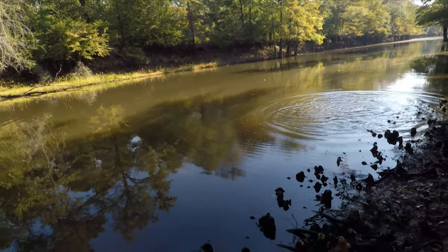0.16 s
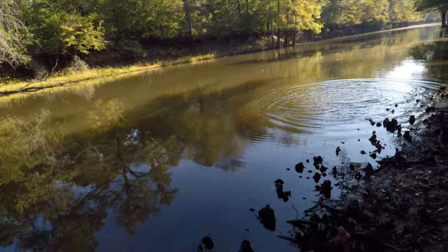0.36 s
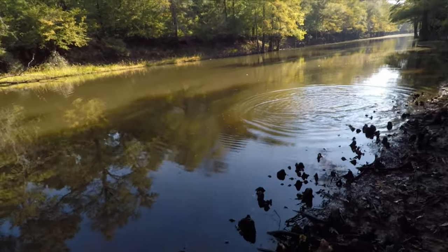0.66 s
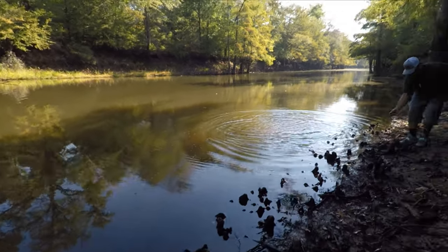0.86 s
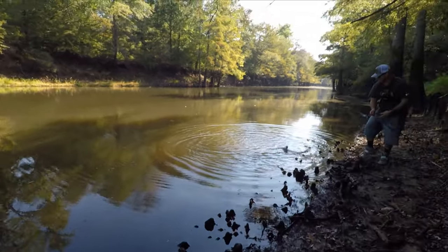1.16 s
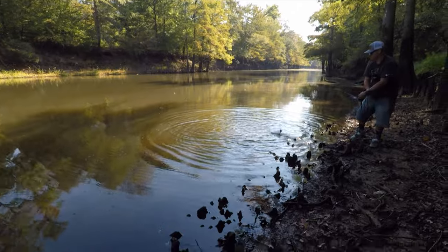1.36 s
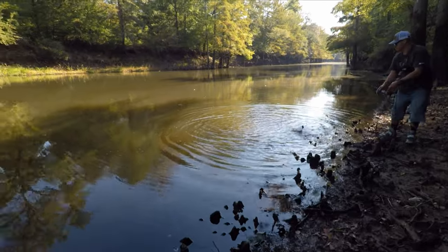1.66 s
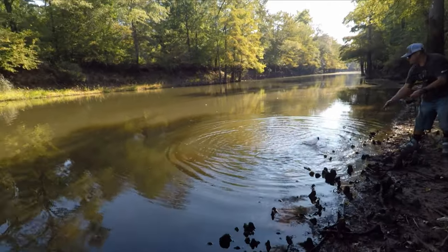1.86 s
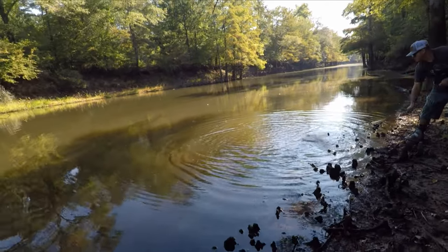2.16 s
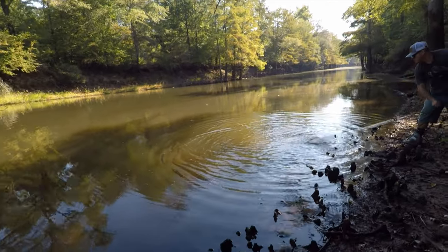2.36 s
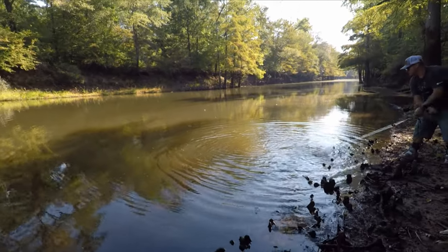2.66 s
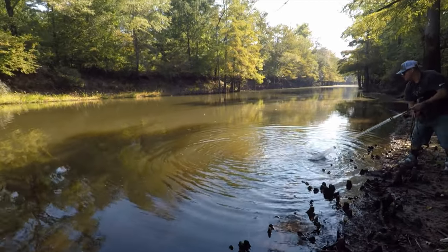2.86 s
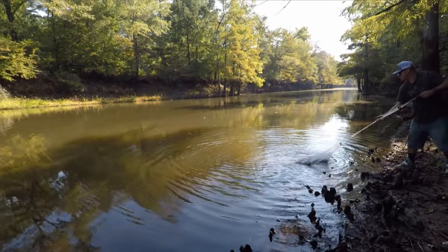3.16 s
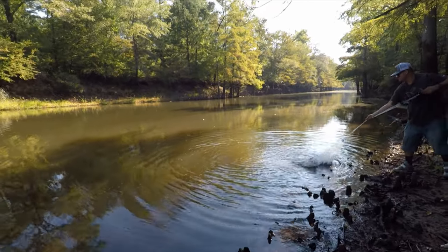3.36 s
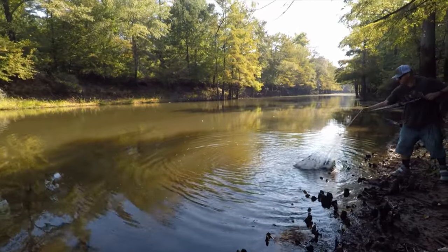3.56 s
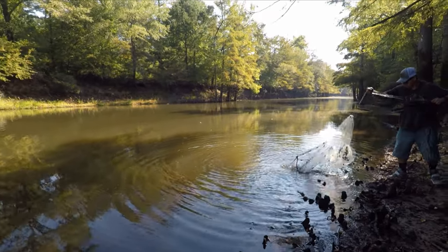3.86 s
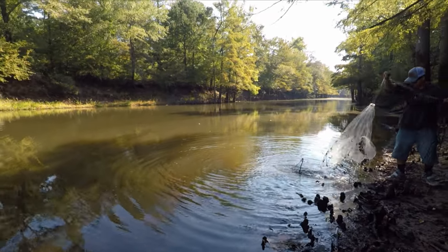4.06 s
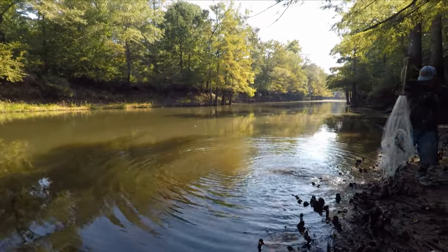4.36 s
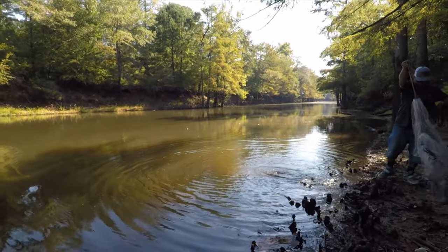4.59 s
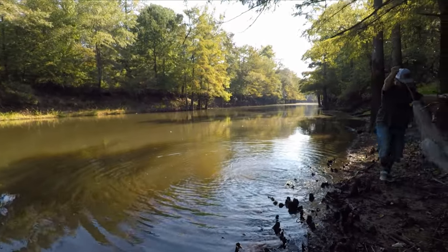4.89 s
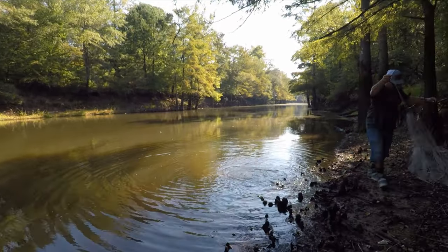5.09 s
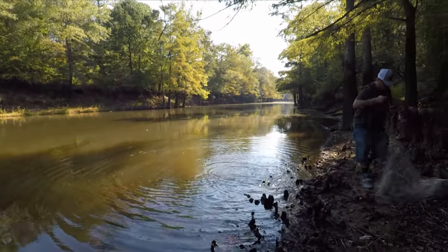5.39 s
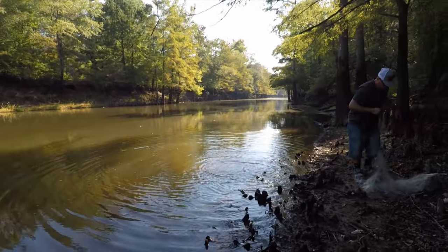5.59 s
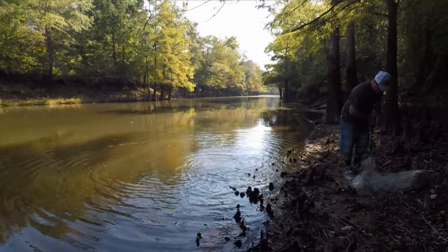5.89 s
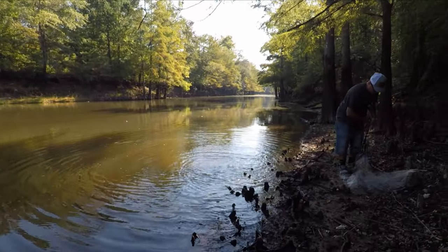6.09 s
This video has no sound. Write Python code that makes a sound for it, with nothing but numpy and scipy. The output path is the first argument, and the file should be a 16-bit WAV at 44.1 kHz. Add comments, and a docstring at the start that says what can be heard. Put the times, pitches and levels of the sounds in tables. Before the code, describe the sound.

A hand-held stereo camera microphone outdoors: low gusts dominate early, heaviest around two seconds, over handling thuds and a thin insect whine. Then water streams and patters off a lifted net, crowded with bright ticks and snaps. One dry knock on the housing is followed by dull fumbling, thinning drips and a brief leafy rustle as the net lands.

```python
"""Water drains in bubbles, drops and spray from a wet cast net hauled out of a calm river and dropped on the bank.
Clicks that ring in narrow bands make the water; short bursts and tones make the snaps of line and leaves.
Filtered noise makes the rustling leaves, soft swishes, far woods and river; dense ringing makes the insects.
A hand-held camera hears it: wind buffets and pops its two microphone ports, and faint blips repeat.
The hand rubs, bumps and once knocks the housing, which rings in its own modes."""
import sys
import numpy as np
from scipy import signal
from scipy.fft import rfft, irfft, next_fast_len
from scipy.io import wavfile
from scipy.ndimage import uniform_filter1d

SR = 44100
rng = np.random.default_rng(int(sys.argv[2]) if len(sys.argv) > 2 else 0)


def file_out(sig):
    """Save sig as 16-bit WAV at sys.argv[1]."""
    # one column per channel
    cols = np.atleast_2d(sig).T
    # limit, then scale
    lim = np.clip(cols, -1, 1)
    pcm = np.round(lim * 32767).astype(np.int16)
    wavfile.write(sys.argv[1], SR, pcm)


N = 274726   # length in samples
OPPOSITE = np.array([[1], [-1]])   # puts a sound at the two ports with opposite signs


def from_db(db):
    """Turn a level in dB into a gain."""
    return 10 ** (np.asarray(db) / 20)


def rms_one(x):
    """Scale each channel to rms 1."""
    return x / np.sqrt(np.mean(x ** 2, axis=-1, keepdims=True) + 1e-20)


def in_time(rows):
    """Draw straight lines between the rows of a table, giving each column a value at every sample."""
    times, *columns = np.transpose(rows)
    return [np.interp(np.arange(N) / SR, times, column) for column in columns]


def shaped(x, points, turn=0):
    """Filter by a curve of f/Hz, level/dB and turn every phase by the same angle in radians."""
    size = next_fast_len(N)
    hz, level_db = np.transpose(points)
    bin_hz = np.arange(size // 2 + 1) * SR / size
    gain = from_db(np.interp(np.log(bin_hz + 1), np.log(hz), level_db))
    return irfft(rfft(x, size) * gain * np.exp(1j * turn), size)[..., :N]


def band(x, low_hz, high_hz):
    """Keep the sound between two frequencies with a Butterworth filter."""
    edges = [low_hz, min(high_hz, SR / 2.2)]
    return signal.sosfilt(signal.butter(2, edges, "band", fs=SR, output="sos"), x)


def low_pass(x, hz):
    """Cut the sound steeply above a frequency with a Butterworth filter."""
    return signal.sosfilt(signal.butter(6, hz, fs=SR, output="sos"), x)


def drift(rate):
    """Wander slowly at random with mean 0 and spread 1; a higher rate wanders faster."""
    r = np.exp(-80 * np.pi * rate / SR)
    noise = rng.standard_normal(N // 40 + 2002)
    slow = signal.lfilter([1], [1, -2 * r, r * r], noise)[2000:]   # one value for 40 samples
    return np.interp(np.arange(N) / 40, np.arange(len(slow)), rms_one(slow - slow.mean()))


def resonance(x, hz, width_hz):
    """Ring at one frequency: a two-pole peak of about gain 1; a narrow peak rings longer."""
    r = np.exp(-np.pi * width_hz / SR)
    feedback = [1, -2 * r * np.cos(2 * np.pi * hz / SR), r * r]
    return signal.lfilter(np.array([1, 0, -1]) * (1 - r * r) / 2, feedback, x)


def add(out, at_s, sound):
    """Mix in a short sound at a time."""
    at = round(at_s * SR)
    out[..., at:at + sound.shape[-1]] += sound[..., :N - at]


def pan(db):
    """Give left and right gains whose levels differ by this many dB."""
    return from_db(np.array([db / 2, -db / 2]))


def grains(low_hz, high_hz, per_s, cycles, spread_db, order=1):
    """Deal random clicks to 12 resonators; more cycles ring longer, a higher order is rounder; rms 1."""
    sizes = from_db(spread_db * np.minimum(rng.exponential(1, N), 4)) * rng.choice([-1, 1], N)
    born = rng.random(N) < per_s * from_db(4 * drift(15)) / SR   # the rate of clicks wanders
    dealt = rng.integers(0, 12, N)
    out = 0
    for k, hz in enumerate(np.geomspace(low_hz, high_hz, 12)):
        rings = sizes * born * (dealt == k) + 1e-18
        for stage in range(order):
            rings = resonance(rings, hz, 6.6 * hz / cycles)   # each stage falls 60 dB in cycles / 3
        out = out + rings
    return rms_one(out)


# tone of the far hiss, alike at both ports: f/Hz, level/dB (relative, per Hz)
HISS_TONE = [(150, -42), (250, -13), (330, 0.5), (563, -6), (978, -14), (1510, -13.5), (2090, -17),
             (2710, -17.5), (5410, -21), (7300, -18.5), (7950, -13), (8300, -23), (9890, -19.5),
             (12800, -32.5), (15500, -22.5)]
# tone of the far hiss that is opposite at the ports: f/Hz, level/dB (relative, per Hz)
HISS_SIDE_TONE = [(150, -10), (250, -5), (458, -2), (525, -4.5), (692, -2.5), (867, -10), (995, -3.5),
                  (3110, -25.5), (5310, -27), (7800, -26), (8300, -23), (12400, -33.5), (15500, -39)]
HISS_DB, HISS_SIDE_DB = -49.5, -44
INSECTS_DB, INSECTS_SWELL_DB, INSECTS_TOP_HZ = -45, 1.5, 8070


def ambience():
    """Far hiss of woods and river from shaped noise, and insects as dense ringing in one narrow band."""
    hiss = rms_one(shaped(rng.standard_normal(N), HISS_TONE))
    side_hiss = rms_one(shaped(rng.standard_normal(N), HISS_SIDE_TONE))
    mid = from_db(HISS_DB + 2.18 * drift(6.2)) * hiss
    side = from_db(HISS_SIDE_DB + 0.69 * drift(14)) * side_hiss
    chorus = [grains(7460, 7870, per_s=5000.0, cycles=170.0, spread_db=-1.0) for port in range(2)]
    insects = from_db(INSECTS_DB + INSECTS_SWELL_DB * drift(1.0)) * low_pass(chorus, INSECTS_TOP_HZ)
    return mid + side * OPPOSITE + insects


PIP_PER_S, PIP_FIRST_S = 30000 / 1001, .0037
PIP_HZ, PIP_S, PIP_DB = 8600, 0.01, -48


def pips():
    """A faint electrical blip once a picture frame: a short swelling tone, a little louder on the right."""
    length = round(PIP_S * SR)
    tone = np.sin(2 * np.pi * PIP_HZ * np.arange(length) / SR)
    pip = from_db(PIP_DB) * np.hanning(length) * tone
    out = np.zeros(N)
    for middle_s in np.arange(PIP_FIRST_S, N / SR, 1 / PIP_PER_S):
        add(out, max(middle_s - PIP_S / 2, 0), pip)
    return out * pan(-1.0)[:, None]


SLOW_DB, SLOW_FOLLOWS = -32, 1.37   # slow pressure when buffeting is -30 dB; dB per dB of buffeting
FLUTTER_DB, FLUTTER_FOLLOWS = -38.5, 1.43   # the faster flutter, likewise
SURGE_S = 0.083   # time from the crest of a surge until its rise in dB is down to 37 percent
WIND_LEFT_DB, WIND_SWAY_DB = -4, 2.5   # left minus right: average, wandering
# wind buffeting the ports, before it wanders: t/s, level/dB
BUFFETING = [(0.0, -54), (0.55, -52), (0.85, -33.5), (1.0, -29.5), (1.1, -28), (1.8, -25.5), (2.2, -26.5),
             (2.7, -27.5), (3.25, -31.5), (3.6, -35.5), (4.75, -48.5), (5.3, -53), (6.13, -38), (6.23, -45)]
# surges of the slow pressure: t/s, level/dB (above the swell)
PRESSURE_SURGES = [(1.72, 18), (1.852, 10), (1.975, 3.5), (2.144, 6.5)]


def wind():
    """Lumpy low noise, drawn apart for each port; slow pressure and flutter grow faster than buffeting."""
    buffet_db, = in_time(BUFFETING)
    t = np.arange(N) / SR
    surge_db = sum(db * np.exp(-((t - s) / SURGE_S) ** 2) for s, db in PRESSURE_SURGES)
    slow = band(rng.standard_normal((2, N)), 8.0, 21.4)
    slow = slow / np.sqrt(uniform_filter1d(slow ** 2, SR // 8, axis=1))   # even out its own ups and downs
    lumps = from_db(2.0 * np.array([drift(6.0), drift(7.9)]))
    noise = rng.standard_normal((2, 2, N))
    above_db = buffet_db + 30
    buffet = rms_one(band(band(noise[0], 25.3, 58.0), 24.5, 84) * lumps) * from_db(buffet_db)
    flutter = rms_one(band(noise[1], 39.0, 126) * lumps)
    flutter = flutter * from_db(FLUTTER_DB + FLUTTER_FOLLOWS * above_db)
    slow = slow * from_db(SLOW_DB + SLOW_FOLLOWS * above_db + surge_db)
    return (slow + buffet + flutter) * pan(WIND_LEFT_DB + WIND_SWAY_DB * drift(2.8))


POP_CYCLES, POP_LEAN = 0.4, 0.95   # half length in cycles; radians that deepen the dip before the crest
# single puffs of wind, near their crests: t/s, level/dB (before lean and pan), f/Hz, left minus right/dB
PUFFS = [(1.059, -13.5, 96, 1), (1.102, -19, 110, -15), (1.122, -18, 86, -17), (1.215, -20, 109, -21),
         (1.255, -21.5, 99, -14), (1.301, -11.5, 93, -15), (1.391, -27, 55, -4), (1.71, -24, 69, -5),
         (1.765, -14.5, 98, 5), (1.806, -22, 101, -6), (1.907, -23, 91.5, -5), (1.974, -18, 93, -2),
         (2.104, -33, 80.5, -1), (2.151, -23, 69, 5), (2.245, -4.5, 120, -12.5), (2.396, -27.5, 68.5, -29),
         (2.623, -23, 73, -21)]


def pops():
    """Each puff pops the ports with about one cycle of pressure, a dip and then a crest."""
    out, late = np.zeros((2, N)), np.arange(SR // 10) / SR - .05
    for s, db, hz, side_db in PUFFS:
        puff = np.exp(-(late * hz / POP_CYCLES) ** 2) * np.cos(2 * np.pi * hz * late - POP_LEAN)
        add(out, s + late[0], from_db(db) * puff * pan(side_db)[:, None])
    return out


SKIN_DB, HOUSING_TOP_HZ = -16.5, 318   # skin rustle against the rumble; top of the rumble
# rumble of the hand on the housing, before it wanders: t/s, level/dB
HAND_RUMBLE = [(0.0, -34.5), (0.36, -45.5), (0.61, -35.5), (0.75, -29), (0.8, -34), (1.0, -33.5),
               (1.18, -36), (1.32, -33), (1.47, -39), (2.08, -38), (2.22, -36), (2.51, -51), (2.69, -47.5),
               (3.47, -48.5), (3.83, -44.5), (4.18, -47.5), (4.35, -45), (4.49, -43), (4.79, -44.5),
               (5.17, -45.5), (5.6, -45), (6.11, -45), (6.23, -46.5)]
# modes of the housing; the bumps also use the last: f/Hz, width/Hz, level/dB (relative)
HOUSING_MODES = [(163.6, 32, 0.5), (198.5, 59, -6), (253.7, 29, -8)]
# rubbing heard out of phase at the ports: f/Hz, width/Hz, level/dB (relative)
RUB_BANDS = [(820, 150, -7.5), (1150, 170, -48), (2000, 400, -66)]


def grip():
    """Uneven friction rings the housing modes, rustles alike at both ports and rubs in opposite phase."""
    level = from_db(in_time(HAND_RUMBLE)[0] + 1.97 * drift(40.0))
    noise = rng.standard_normal((4, N))
    ringing = sum(from_db(db) * resonance(noise[:2], hz, width) for hz, width, db in HOUSING_MODES)
    mid, side = rms_one(low_pass(band(ringing, 137.6, 305), HOUSING_TOP_HZ))
    rub = sum(from_db(db) * rms_one(resonance(noise[2], hz, width)) for hz, width, db in RUB_BANDS)
    skin = from_db(SKIN_DB) * rms_one(band(noise[3], 310, 1290))
    opposed = from_db(-5.0) * side + from_db(0.5) * rub
    return level * (mid + skin + OPPOSITE * opposed)


SWELL_S = 0.0084   # from the crest of the push until its envelope is down to 37 percent
UPPER_DB, UPPER_DB_PER_OCTAVE = -1, 12.5   # upper ring of a 200 Hz bump; deeper bumps stir it less
SCUFF_DB, SCUFF_T60_S = -16.5, 0.037   # skin scuff for a bump at the upper mode; time to fall 60 dB
# bumps of the housing; the crest is 11 ms later, level is before pan, sway is against the push:
# t/s, level/dB (peak), f/Hz, left minus right/dB, sway level/dB
HOUSING_BUMPS = [(0.073, -27, 198, 4, -18), (0.291, -33, 179, -7, -16), (0.623, -20, 159, -2, -5),
                 (0.66, -20, 160, -7, -12), (0.735, -15.5, 147, -1, -11), (0.856, -22, 154, -7, -2),
                 (0.907, -33, 242, 7, -8), (0.975, -34, 243, 1, -8), (1.045, -21.5, 243, -1, 4),
                 (1.082, -31.5, 233, 1, -10), (1.195, -27.5, 213, -7, 6), (1.224, -32.5, 250, -12, 16),
                 (1.36, -28, 196, -5, -14), (4.611, -25.5, 258, 2, 0), (4.732, -22.5, 176, 4, -5),
                 (4.76, -28, 268, 4, 4), (4.81, -22.5, 184, 3, -10), (4.87, -23.5, 175, 5.5, 4),
                 (4.937, -30, 174, -4, -5), (5.004, -26, 260, -4, 9), (5.087, -40, 327, 3, -14),
                 (5.156, -40, 302, -3, -21), (5.322, -36, 242, -7, 8), (5.4, -34, 187, -2, 1),
                 (5.417, -31, 170, 2, -6), (5.544, -36, 181, 3, -14), (5.676, -29.5, 297, 4.5, 5),
                 (5.685, -24, 179, -5.5, 5), (5.775, -29.5, 276, 0, -6), (5.78, -25, 202, 6.5, 8.5),
                 (5.796, -37, 195, 2, 0)]


def bumps():
    """Soft contacts: a rising push rings an upper mode, skin scuffs, and a sway opposes at the ports."""
    out, t = np.zeros((2, N)), np.arange(SR // 5) / SR
    late = t - .011
    upper_hz = HOUSING_MODES[2][0]
    swell = np.exp(-(late / SWELL_S) ** 2)
    after = np.where(late < 0, np.exp(-(late / 0.00064) ** 2), from_db(-60 * late / 0.077))
    scuffs = rms_one(band(rng.standard_normal((len(HOUSING_BUMPS), len(t))), 153, 870))
    scuffs = scuffs * from_db(SCUFF_DB - 60 * np.abs(late) / SCUFF_T60_S)
    phases = rng.uniform(0, 2 * np.pi, (len(HOUSING_BUMPS), 2))
    for (s, db, hz, side_db, sway_db), phase, scuff in zip(HOUSING_BUMPS, phases, scuffs):
        push = swell * np.sin(2 * np.pi * hz * (late + 2.9 * late ** 2) + phase[0])
        upper_db = UPPER_DB + UPPER_DB_PER_OCTAVE * np.log2(hz / 200)
        upper = from_db(upper_db) * after * np.sin(2 * np.pi * upper_hz * late + phase[0])
        sway = from_db(sway_db) * np.exp(-(late / 0.0061) ** 2) * np.sin(2 * np.pi * 110 * t + phase[1])
        skin = scuff * (hz / upper_hz) ** 2   # higher bumps scuff more
        bump = push + upper + sway * OPPOSITE + skin
        add(out, s, from_db(db) * bump * pan(side_db)[:, None])
    return out


KNOCK_ATTACK_S, KNOCK_TOP_HZ = .0008, 2700
# something hard strikes the housing: t/s, level/dB (of the whole knock), left minus right/dB (of its ring)
HARD_KNOCK = (4.4087, -10, -15.5)
# short modes it rings, before the attack and low-pass: f/Hz, level/dB (relative), time to fall 60 dB/s
KNOCK_RINGS = [(460, -31, 0.004), (1030, 12.5, 0.003), (1590, -18, 0.0021), (2300, -13, 0.006)]


def knock():
    """One hard blow rings the short modes of the housing and leaves a rattling tail of noise."""
    t = np.arange(SR // 5) / SR
    s, knock_db, side_db = HARD_KNOCK
    ring = sum(from_db(db - 60 * t / t60) * np.sin(2 * np.pi * hz * t) for hz, db, t60 in KNOCK_RINGS)
    rattle = rms_one(band(rng.standard_normal((2, len(t))), 230, 1200))
    tail = from_db(-15.5 - 60 * t / 0.17) * rattle
    blow = tail - low_pass(ring, KNOCK_TOP_HZ) * pan(side_db)[:, None]
    out = np.zeros((2, N))
    add(out, s, from_db(knock_db) * blow * np.minimum(t / KNOCK_ATTACK_S, 1))
    return out


SWISH_WIDTH = 0.27   # width of each resonance as a share of its centre
# soft airy swells: t/s (start), length/s, f/Hz (centre), level/dB (before the swell)
AIRY_SWELLS = [(0.166, 0.71, 6850, -47.5), (0.508, 0.066, 2980, -48), (0.701, 0.069, 6750, -41.5),
               (1.074, 0.18, 11700, -58), (2.262, 0.12, 1490, -47.5), (2.328, 0.37, 1690, -53.5),
               (2.296, 0.4, 6500, -52.5), (4.45, 0.59, 12000, -60)]


def swishes():
    """Smooth bands of noise swell and fade, drawn apart for each port."""
    out = np.zeros((2, N))
    for s, length, hz, db in AIRY_SWELLS:
        noise = rng.standard_normal((2, SR))[:, :round(length * SR)]
        width_hz = SWISH_WIDTH * hz
        air = rms_one(resonance(resonance(noise, hz, width_hz), hz, width_hz))
        add(out, s, from_db(db) * np.hanning(noise.shape[1]) ** .5 * air)
    return out


# the net settles on leaves: t/s (start), time to fade to 37 percent/s, level/dB (of the low crackles)
LEAF_RUSTLES = [(5.43, 0.046, -38.5), (5.522, 0.043, -44.5)]


def rustles():
    """Leaves crackle as dense short rings in two bands, which start fast and then fade."""
    level, t = np.zeros(N), np.arange(SR // 5) / SR
    for s, length, db in LEAF_RUSTLES:
        add(level, s, from_db(db) * np.minimum(t / 0.0071, 1) * np.exp(-(t / length) ** 4))
    low = grains(560, 1200, per_s=1200.0, cycles=16.0, spread_db=2.5)
    high = grains(1340, 5800, per_s=720.0, cycles=14.0, spread_db=2.0)
    return level * (low + from_db(-8.0) * high)


SNAP_HOLD_S, SNAP_T60_S = 0.0019, 0.021   # the burst holds, then takes this long to fall 60 dB
CRACK_DB = 17   # height of the starting click against the raw noise
BURST_DB_PER_OCTAVE = -15.5   # bands away from the centre are weaker
RING_DB, RING_RISE_S, RING_T60_S = -7, 0.0012, 0.03   # noisy ring: against the listed level, rise, fall
PLINK_DB, PLINK_CYCLES, PLINK_LONGEST_S = 9, 24, .017   # clean tone: likewise, time to fall 60 dB
PLINK_BEND = 4   # the pitch rises by twice this share per second
ECHO_DB, ECHO_T60_S, ECHO_LAG_S = -13.5, 0.37, 0.015   # against the burst bands, fall, build-up
# snaps and splashes, levels before the settings above:
# t/s, ring level/dB, ring f/Hz, burst level/dB, burst centre f/Hz
SNAPS_AND_SPLASHES = [(0.298, -38, 1150, -34, 1800), (0.934, -35, 9000, -38, 7000),
                      (0.97, -24.5, 3570, -39, 3500), (1.134, -52, 5500, -55, 5500),
                      (1.139, -44, 3020, -57, 4000), (1.221, -40, 5400, -55, 5000),
                      (1.245, -40, 3320, -55, 3300), (1.264, -42, 2900, -53, 3000),
                      (1.314, -27.5, 2900, -42, 4000), (1.3145, -38, 4630, -50, 4500),
                      (1.889, -54, 696, -34.5, 8000), (1.966, -38, 614, -30, 1110),
                      (2.132, -22, 820, -18, 4480), (2.152, -28, 585, -39, 900),
                      (2.22, -37, 2300, -48, 3020), (2.717, -46, 3780, -46, 5000),
                      (2.748, -51, 4300, -49, 4030), (3.051, -29, 2870, -21.5, 1590),
                      (3.074, -38, 850, -23.5, 1800), (3.144, -43, 1090, -55, 1100),
                      (3.223, -45, 2580, -57, 2600), (3.281, -46, 5500, -39, 3100),
                      (3.416, -27, 7300, -28.5, 4130), (3.686, -34, 820, -38, 1300),
                      (3.752, -40, 1080, -55, 1100), (3.776, -37, 1020, -50, 1300),
                      (3.839, -34, 875, -54, 2700), (3.861, -44, 3140, -40, 3000),
                      (3.876, -32, 2350, -36, 2480), (3.898, -38, 2060, -39, 2500),
                      (3.929, -42, 3500, -44, 3000), (3.978, -32, 6200, -18, 1540),
                      (4, -35, 1100, -46, 2000), (4.068, -47, 1000, -51, 1200),
                      (4.081, -30.5, 5430, -49, 7000), (4.098, -35, 9500, -35, 9000),
                      (4.113, -38, 2500, -54, 2500), (4.127, -31, 3650, -49, 3300),
                      (4.143, -31, 2690, -50, 3000), (4.163, -24, 5700, -41, 5500),
                      (4.173, -31, 930, -43, 2200), (4.203, -29.5, 1060, -13, 1680),
                      (4.211, -27, 4540, -21.5, 2410), (4.241, -33, 660, -22, 1710),
                      (4.256, -26.5, 2500, -21, 1480), (4.286, -40, 1030, -42, 1500),
                      (4.338, -37, 5600, -49, 5500), (4.396, -32, 5550, -35.5, 6000),
                      (4.464, -23, 6800, -33, 7000), (4.477, -39, 3500, -44, 4000),
                      (4.544, -33.5, 3360, -31, 4000), (4.546, -42, 2150, -46, 2200),
                      (4.584, -40.5, 2520, -52, 2500), (4.649, -28, 6460, -58, 5500),
                      (4.671, -30, 5730, -42, 3300), (4.671, -36.5, 2620, -50, 2600),
                      (4.678, -29, 6030, -46, 6000), (4.731, -36, 5200, -44, 4500),
                      (4.776, -29, 790, -43, 900), (5.431, -36, 940, -37, 1500),
                      (5.433, -35, 2830, -42, 2800), (5.446, -27.5, 2420, -32, 2000),
                      (5.466, -39, 3200, -41, 2800), (5.518, -40.5, 3550, -33, 4020),
                      (5.532, -43, 2300, -42, 1500), (5.538, -47, 1090, -40, 1500)]


def snaps():
    """A click and noise burst in three bands, a clean tone, a noisy ring and a long echo off the bank."""
    out, t = np.zeros(N), np.arange(SR // 4) / SR
    dying = from_db(-60 * np.maximum(t - SNAP_HOLD_S, 0) / SNAP_T60_S)
    swelling = np.minimum(t / RING_RISE_S, 1) * from_db(-60 * t / RING_T60_S)
    click = from_db(CRACK_DB) * (t == 0)
    echo = from_db(ECHO_DB - 60 * t / ECHO_T60_S) * np.minimum(t / ECHO_LAG_S, 1) ** 2
    noises = rng.standard_normal((len(SNAPS_AND_SPLASHES), 2, len(t)))
    for (s, db, hz, burst_db, centre_hz), noise in zip(SNAPS_AND_SPLASHES, noises):
        burst = 0
        for low_hz, high_hz in ((500, 1070), (1600, 5780), (4500, 8020)):
            octaves = abs(np.log2(np.sqrt(low_hz * high_hz) / centre_hz))
            gain = from_db(burst_db + BURST_DB_PER_OCTAVE * octaves)
            burst = burst + gain * rms_one(band(noise[0] + click, low_hz, high_hz))
        ring = rms_one(band(resonance(noise[1], hz, 0.12 * hz), hz / 2, 2.84 * hz))
        ring = from_db(db + RING_DB) * ring * swelling
        plink_t60 = min(PLINK_CYCLES / hz, PLINK_LONGEST_S)
        tone = np.sin(2 * np.pi * hz * (t + PLINK_BEND * t ** 2))
        plink = from_db(db + PLINK_DB - 60 * t / plink_t60) * tone * np.minimum(t * hz / 2, 1)
        add(out, s, burst * dying + plink + ring + burst * echo)
    return out


BUBBLES_DB, BUBBLES_FOLLOW = -55.5, 0.65   # when the drops are -55 dB; dB per dB of drops
FULL_FLOW_DB, SPRAY_TOP_HZ = -45, 9500
DRIPS_DB, DRIPS_FOLLOW = -47, 2   # when the drops are at full flow; dB per dB of drops
SPATTER_DB, SPATTER_FOLLOWS = -50, 2   # likewise, following the spray
# water draining from the net: t/s, drops level/dB, spray against drops level/dB
DRAINING = [(0.0, -58.5, -22), (0.14, -57, 6), (0.47, -54, -11), (1.0, -51.5, 3.5), (1.47, -58.5, 5.5),
            (1.73, -52.5, -1), (2.44, -62.5, -1), (2.76, -61, -2), (2.97, -57, -5), (3.57, -52, -0.5),
            (4.04, -46.5, 1), (4.34, -50.5, 5.5), (4.63, -54, 9), (5.08, -60.5, 5.5), (5.38, -59.5, 10.5),
            (5.5, -51.5, 3.5), (5.64, -73, 12), (6.23, -108, 12)]


def water():
    """Bubbles ring low, drops in the middle, spray high; drips and spatter grow fast with the flow."""
    drops_db, spray_against_db = in_time(DRAINING)
    spray_db = drops_db + spray_against_db
    bubbles_db = BUBBLES_DB + BUBBLES_FOLLOW * (drops_db + 55)
    drips_db = DRIPS_DB + DRIPS_FOLLOW * (drops_db - FULL_FLOW_DB)
    spatter_db = SPATTER_DB + SPATTER_FOLLOWS * (spray_db - FULL_FLOW_DB)
    drips = grains(850, 3600, per_s=500., cycles=55.0, spread_db=3.0, order=2)
    spatter = grains(2200, 8000, per_s=400., cycles=40.0, spread_db=3.5, order=2)
    bubbles = grains(830, 1224, per_s=600.0, cycles=40.0, spread_db=-1.5)
    drops = grains(1890, 3800, per_s=1100.0, cycles=60.0, spread_db=2.0)
    spray = grains(5400, 8300, per_s=1500.0, cycles=30, spread_db=2.0)
    return (from_db(bubbles_db) * bubbles
            + from_db(drops_db) * drops
            + from_db(spray_db) * low_pass(spray, SPRAY_TOP_HZ)
            + from_db(drips_db) * drips
            + from_db(spatter_db) * low_pass(spatter, SPRAY_TOP_HZ))


PORT_TURN = 1.96   # radians between sum and difference
# difference of the two ports against their sum: f/Hz, level/dB
PORT_DIFFERENCE = [(60, 1), (120, -7), (240, -6), (480, 3), (950, 2), (1890, 1), (3770, -10), (7520, 0.5),
                   (15000, -2)]


def scene():
    """Sounds from the bank reach two close ports, whose difference has its own tone; the rest is added."""
    bank = water() + snaps() + rustles()
    airborne = bank + shaped(bank, PORT_DIFFERENCE, PORT_TURN) * OPPOSITE
    background = ambience() + pips() + wind() + pops()
    handling = grip() + bumps() + knock()
    return airborne + background + handling + swishes()


CUTOFF_HZ = 15400


def record(dry):
    """Peaks clip at full scale, then a steep filter cuts the top."""
    top_cut = signal.cheby2(12, 70, CUTOFF_HZ, fs=SR, output="sos")
    return signal.sosfilt(top_cut, np.clip(dry, -1, 1))


dry = scene()
out = record(dry)
file_out(out)
```